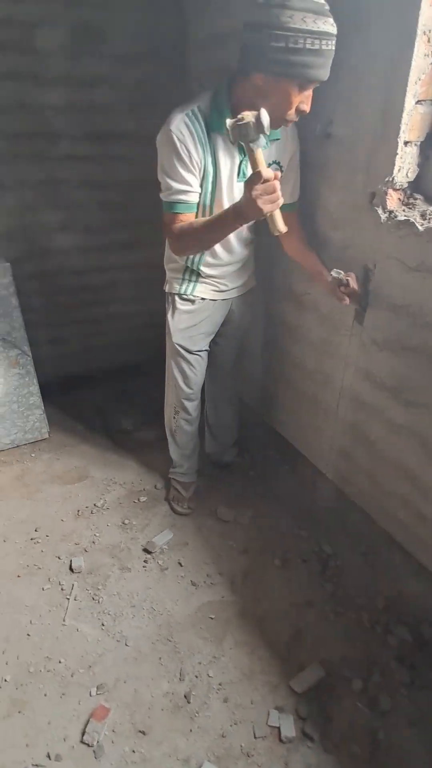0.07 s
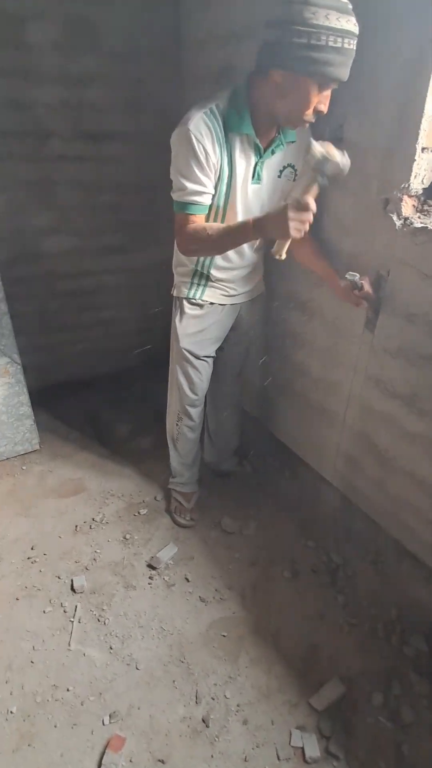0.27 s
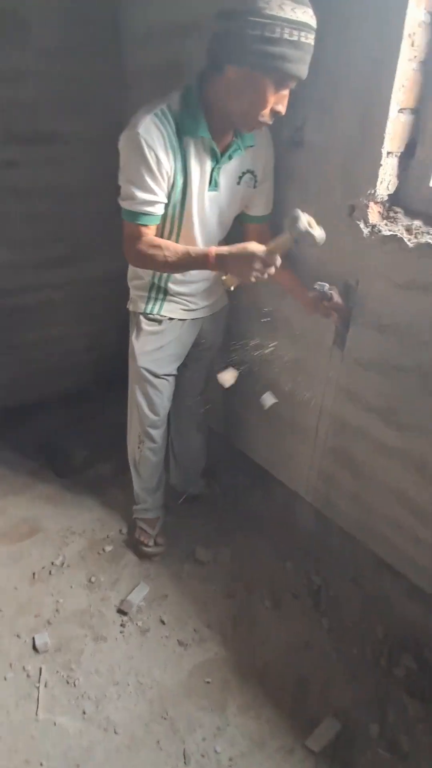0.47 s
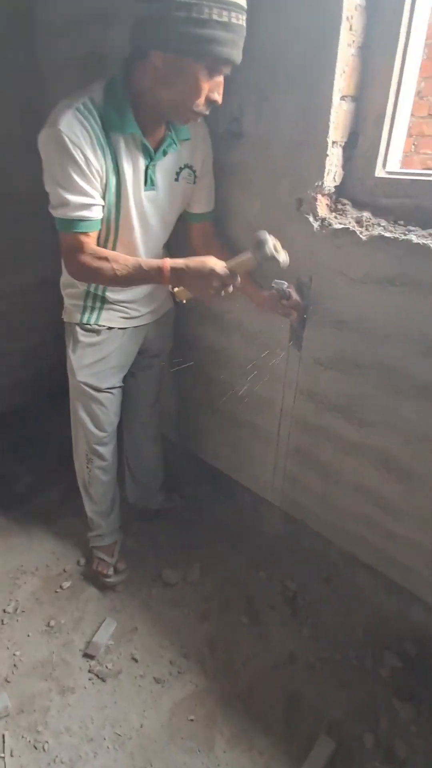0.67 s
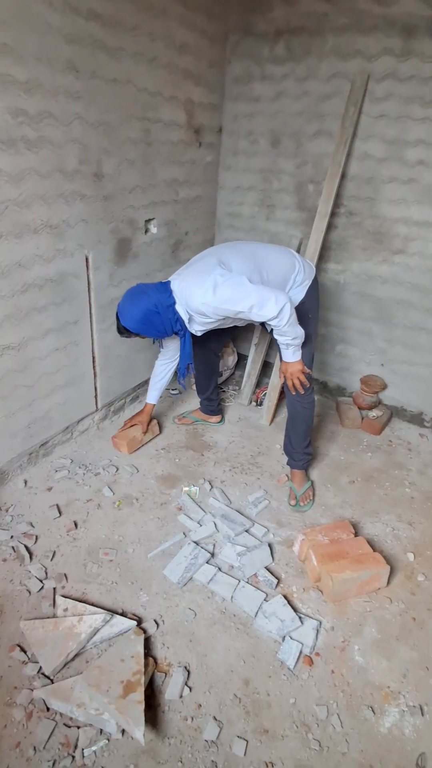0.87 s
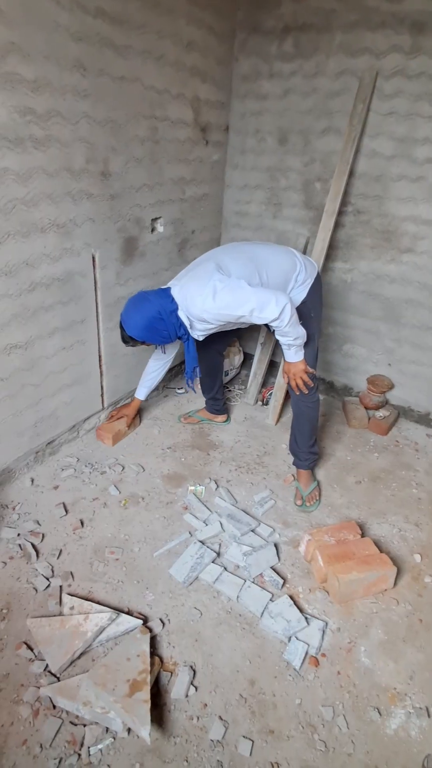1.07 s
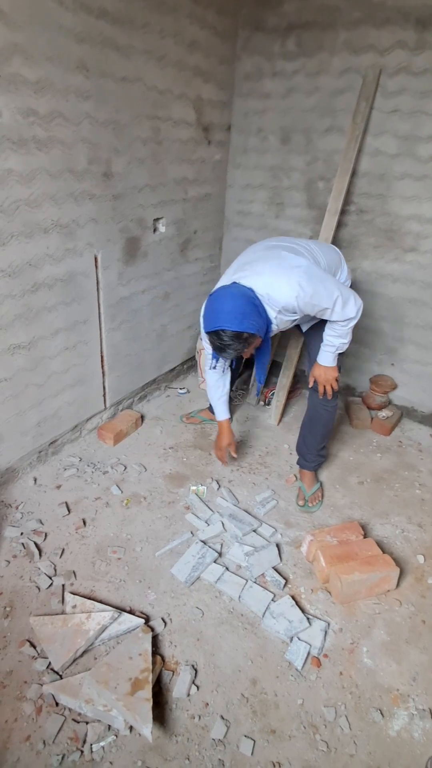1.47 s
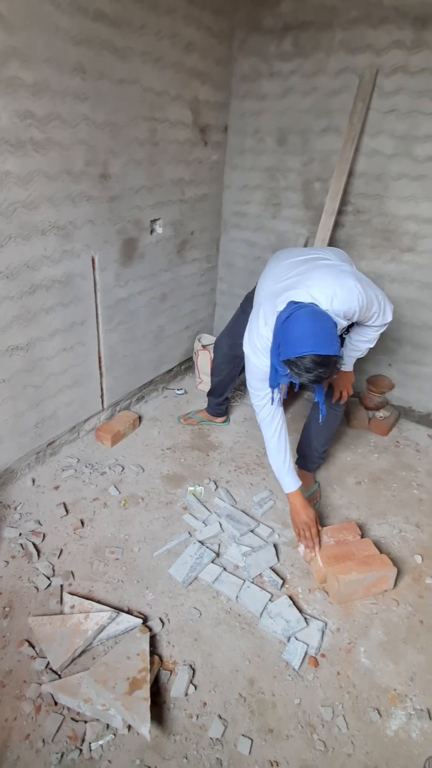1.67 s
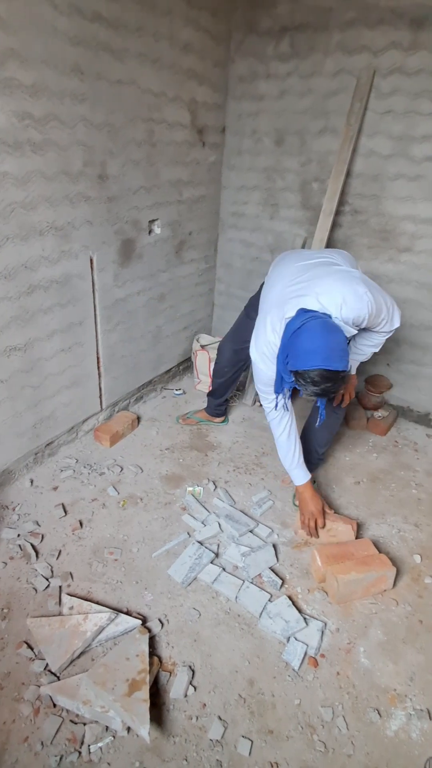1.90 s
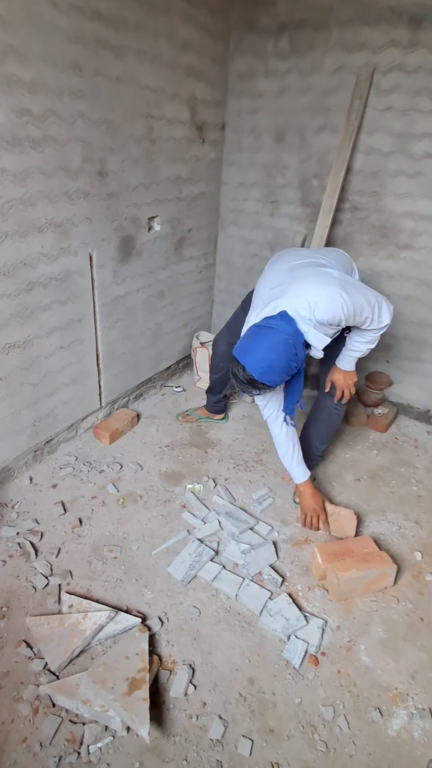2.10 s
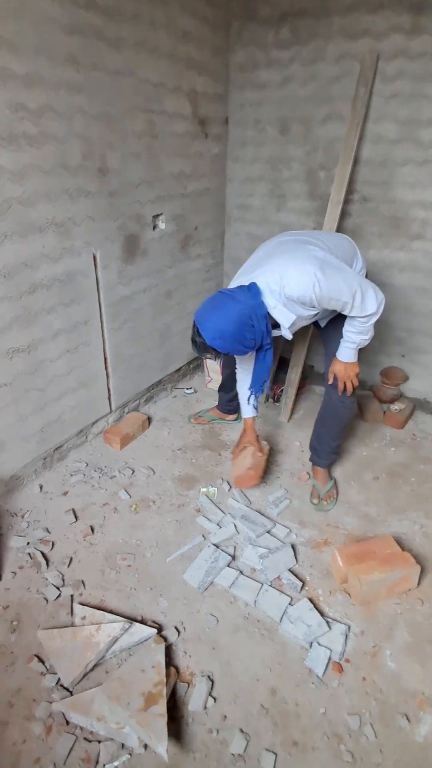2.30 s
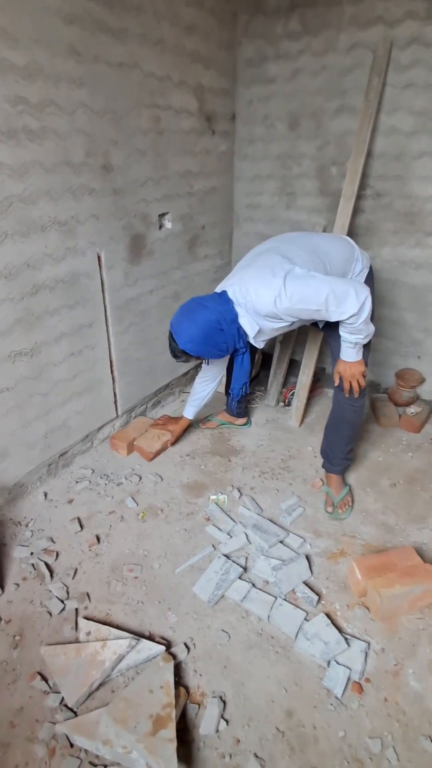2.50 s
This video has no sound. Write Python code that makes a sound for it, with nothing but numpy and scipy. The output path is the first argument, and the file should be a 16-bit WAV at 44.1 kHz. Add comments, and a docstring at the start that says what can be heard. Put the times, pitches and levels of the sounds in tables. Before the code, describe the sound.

A hammer strikes a chisel into masonry three times, then bricks knock and scrape.

```python
"""A bare, ringing room: a hammer drives a chisel into the wall, three hard blows.
Each cracks the masonry, rings the steel and sets the wall booming. Abrupt change to a second
bare room, where bricks are knocked, set down and dragged on a gritty floor.
Puffs of air buffet the two microphone ports, mostly in the second room."""
import sys
import numpy as np
from scipy import signal
from scipy.fft import rfft, irfft
from scipy.io import wavfile

SR = 44100
rng = np.random.default_rng(int(sys.argv[2]) if len(sys.argv) > 2 else 0)


def pcm_store(signal):
    """Save signal as 16-bit PCM."""
    levels = np.round(np.clip(np.atleast_2d(signal), -1, 1) * 32767)
    wavfile.write(sys.argv[1], SR, levels.astype(np.int16).T)


N = 116865
EVENT_SAMPLES = 48000
ROOM_HOLD_S = 0.016  # early echoes hold the level
# decay of the second room: f/Hz, t60/s
ROOM_DECAY = [(200, 0.56), (700, 0.27), (7000, 0.23), (13000, 0.13)]
# spectrum of crushed grit: f/Hz, level/dB
GRIT_SPECTRUM = [(200, 13), (900, -5), (1200, -9), (2300, 1), (3500, -2.5), (7000, -2), (8800, -11),
                 (12000, -6.5), (15500, -11.5)]


def undb(db):
    """Decibels to gain."""
    return 10 ** (np.asarray(db) / 20)


def unit(x):
    """Each channel to rms 1."""
    return x / np.sqrt(np.mean(x ** 2, axis=-1, keepdims=True))


def lookup(points, hz):
    """Interpolate (f/Hz, value) points over log frequency."""
    f, v = np.array(points).T
    return np.interp(np.log(np.maximum(hz, 1)), np.log(f), v)


def pan(db):
    """Channel gains for a left-minus-right level difference."""
    return undb(np.array([[db], [-db]]) / 2)


def blend(x, share):
    """Correlate two independent channels by share, 0 to 1."""
    mid = (x[0] + x[1]) / 2 * np.sqrt(1 + share)
    side = (x[0] - x[1]) / 2 * np.sqrt(1 - share)
    return np.array([mid + side, mid - side])


def add(out, start_s, sound):
    """Mix a sound in at its time."""
    i = max(int(start_s * SR), 0)
    out[:, i:i + sound.shape[1]] += sound[:, :max(N - i, 0)]


def noise(colour, size):
    """Coloured noise, channels independent."""
    gain = undb(lookup(colour, np.fft.rfftfreq(size, 1 / SR)))
    return unit(irfft(rfft(rng.standard_normal((2, size))) * gain, size))


def envelope(rise_s, hold_s, t60_s):
    """Linear rise; exponential fall from hold_s after onset."""
    age = np.arange(EVENT_SAMPLES) / SR
    attack = np.minimum(age / max(rise_s, 1 / SR), 1)
    return attack * np.exp(-np.log(1000) * np.maximum(age - hold_s, 0) / t60_s)


def flutter(rate_hz):
    """Smooth random motion per channel, spread near 1."""
    at = np.arange(EVENT_SAMPLES) / SR * rate_hz
    knots = rng.standard_normal((2, EVENT_SAMPLES // 8))
    return np.array([np.interp(at, np.arange(len(row)), row) for row in knots])


def burst(colour, decays, rise_s, hold_s, tilt_db_oct=0, pan_db_oct=0):
    """A contact smeared by bare walls: grainy, unevenly coloured echoes; treble dies first."""
    hz = np.maximum(np.fft.rfftfreq(EVENT_SAMPLES, 1 / SR), 1)
    octaves = np.log2(hz / 2000)
    grains = rng.standard_normal((2, EVENT_SAMPLES)) * undb(1.5 * flutter(rate_hz=900))
    ripple_step_hz = 127.2
    ripple = np.interp(hz / ripple_step_hz, np.arange(EVENT_SAMPLES), rng.standard_normal(EVENT_SAMPLES))
    ripple_db = 4.5 * ripple * np.sqrt(np.minimum(hz / 2500, 2500 / hz))
    gain = undb(lookup(colour, hz) + tilt_db_oct * octaves + ripple_db)
    echoes = unit(irfft(rfft(grains) * gain))
    spectrum = rfft(echoes) * pan(pan_db_oct) ** octaves
    centres_hz, out = np.geomspace(60, 16000, 14), 0
    for centre_hz, weights in zip(centres_hz, np.eye(len(centres_hz))):
        band = irfft(spectrum * np.interp(np.log(hz), np.log(centres_hz), weights))
        out = out + band * envelope(rise_s, hold_s, lookup(decays, centre_hz))
    return out


def ring(modes, rise_s, hold_s, steady):
    """Decaying modes; overlapping echoes make level and phase waver about a steady part."""
    age, out = np.arange(EVENT_SAMPLES) / SR, 0
    for hz, db, t60_s in modes:
        blur_hz = 45 * min(hz / 500, 2) + 0.025 * hz
        phasor = steady * np.exp(2j * np.pi * rng.random((2, 1)))
        phasor = phasor + flutter(blur_hz) + 1j * flutter(blur_hz)
        tone = (phasor * np.exp(2j * np.pi * hz * age)).real
        fall = envelope(rise_s, hold_s, t60_s)
        out = out + undb(db) * unit(tone * fall) * np.sqrt(np.mean(fall ** 2))
    return out


def chisel():
    """Blows snap, echo, ring the steel and set the wall booming; the chisel is lightly reseated."""
    # hammer blows: t/s, level/dB, tilt/(dB/oct), rise/s, boom/dB, bite/Hz
    blows = [(0.2202, -16.5, -0.81, 0.00062, -1.5, 3760), (0.4458, -18.5, -0.5, 0.0048, -4.5, 900.5),
             (.679, -19, -1.07, 0.0074, -3, 1850)]
    # steel on masonry: f/Hz, level/dB
    crack_spectrum = [(40, -13.5), (130, -2), (300, 1), (600, -6.5), (1000, -3.5), (1900, -4.5),
                      (2800, -6.5), (6800, -6), (8700, -16.5), (10500, -11.5), (13000, -9), (15500, -16.5)]
    # decay of the first room: f/Hz, t60/s
    hall_decay = [(100, 1.1), (300, 0.67), (700, 0.67), (1800, 0.42), (4800, 0.27), (8000, 0.19),
                  (13000, 0.15)]
    # decay of the direct snap: f/Hz, t60/s
    snap_decay = [(1500, .03), (8000, .008)]
    # chisel and hammer head: f/Hz, level/dB, t60/s
    steel_modes = [(843, -32.5, 0.62), (1022, -37, 0.39), (1268, -40.5, 0.28), (1449, -34, 0.6),
                   (2024, -43, 0.87), (2850, -33, .35), (3697, -46, 0.18), (3820, -36, 0.42),
                   (5250, -41.5, 0.19), (6600, -39.5, 0.18), (11680, -31, 0.098), (12340, -29.5, 0.081),
                   (13760, -32.5, 0.09)]
    # wall and room: f/Hz, level/dB, t60/s
    wall_modes = [(86.6, -36, 0.99), (180.94, -38.5, 1.5), (268.4, -38.5, 0.53), (314.5, -33.5, 1)]
    # chisel set on the wall: t/s, level/dB, rise/s
    seatings = [(0.632, -42.5, .015)]
    hold_s, snap_db = 0.034, -4
    bite_db, bite_oct = 5.5, 0.7  # each bite stresses its own band
    out = np.zeros((2, N))
    for start_s, db, tilt_db_oct, rise_s, boom_db, bite_hz in blows:
        colour = [(hz, band_db + bite_db * np.exp(-(np.log2(hz / bite_hz) / bite_oct) ** 2))
                  for hz, band_db in crack_spectrum]
        crumble = undb(1.7 * flutter(rate_hz=190))  # masonry gives way in jerks
        crack = undb(db) * burst(colour, hall_decay, rise_s, hold_s, tilt_db_oct, pan_db_oct=-0.5)
        snap = burst(colour, snap_decay, 0, 0, tilt_db_oct)[:1]
        add(out, start_s + rise_s, undb(db + snap_db) * snap)
        detune = 1 + 0.004 * rng.uniform(-1, 1)  # grip and bite shift the pitch
        modes = [(hz * detune, mode_db, t60_s) for hz, mode_db, t60_s in steel_modes]
        steel = ring(modes, rise_s, hold_s, steady=1)
        boom = undb(boom_db) * blend(ring(wall_modes, rise_s=0.028, hold_s=0.099, steady=3.5), share=1)
        add(out, start_s, crack * crumble * pan(db=-3) + steel * pan(db=-0.5) + boom)
    for start_s, db, rise_s in seatings:
        add(out, start_s, undb(db) * burst(GRIT_SPECTRUM, hall_decay, rise_s, hold_s=0.053))
    return out


def knocks():
    """The first brick meets the floor: clink, dull thud, crunch of grit; the last, faint contact is the second
    brick scuffing."""
    # contacts: t/s, ring/dB, thud/dB, grit/dB, rise/s
    contacts = [(.762, 2.5, -31.5, -38, 0.045), (1.048, -7.5, -36.5, -44, 0.016),
                (1.069, 4.5, -18, -41, 0.0026), (1.175, -36, -53, -57, 0.0054)]
    # first brick: f/Hz, level/dB, t60/s
    brick_modes = [(886, -42, 0.34), (1496, -32, 0.3), (1532, -43, 0.44), (2084, -49, 0.28),
                   (3090, -48, .22)]
    # floor thud: f/Hz, level/dB
    thud_spectrum = [(80, -9.5), (250, -11.5), (390, -4.5), (490, -13.5), (680, -3), (820, -13.5),
                     (1080, -33), (2000, -38), (4000, -67)]
    # crushed grit, coloured by the brick: f/Hz, level/dB
    crunch_spectrum = [(1900, -0.5), (2600, -14), (3200, 4.5), (4250, -8), (4650, -1.5), (7500, -2.5),
                       (8800, -10.5), (11000, -3), (15500, -7.5)]
    out = np.zeros((2, N))
    for start_s, ring_db, thud_db, grit_db, rise_s in contacts:
        clink = undb(ring_db) * ring(brick_modes, rise_s, ROOM_HOLD_S, steady=0.34)
        thud = undb(thud_db) * blend(burst(thud_spectrum, ROOM_DECAY, rise_s, ROOM_HOLD_S), share=0.29)
        crunch = undb(grit_db) * grit(crunch_spectrum, rise_s, hold_s=0.035)
        add(out, start_s, clink + thud * pan(db=-1) + crunch)
    return out


def scrapes():
    """The second brick slides on grit, which rings it, then clacks against its neighbour."""
    # drags and touches: t/s, rise/s, ring/dB, grit/dB, pan/dB
    drags = [(1.33, 0.014, -37, -59.5, 1), (1.743, 0.031, -8, -51.5, -0.5), (1.788, 0.042, -2, -44.5, -0.5),
             (1.95, 0.039, -28.5, -60, -2), (2.049, 0.08, -30, -61, -1), (2.174, 0.011, -6, -60, -2),
             (2.561, 0.0049, -1.5, -47, 0.5), (2.589, 0.0034, 4, -61, 0), (2.616, 0.024, 6, -41, 0)]
    # second brick: f/Hz, level/dB, t60/s
    brick_modes = [(832, -46, 0.18), (1090, -72.5, 0.16), (1430, -67, 0.25), (2010, -62, .2),
                   (2300, -60, 0.38)]
    # brick on brick: f/Hz, level/dB, t60/s
    clack_modes = [(1403, -50.5, 0.25), (2870, -47.5, .11), (3650, -48, 0.099)]
    out = np.zeros((2, N))
    for start_s, rise_s, ring_db, grit_db, pan_db in drags:
        hold_s = rise_s + 0.024
        body = undb(ring_db) * ring(brick_modes, rise_s, hold_s, steady=0.54)
        crunch = undb(grit_db) * grit(GRIT_SPECTRUM, rise_s, hold_s)
        add(out, start_s, pan(pan_db) * (body + crunch))
    clack = ring(clack_modes, rise_s=0.0017, hold_s=ROOM_HOLD_S, steady=0.44)
    add(out, start_s=2.618, sound=clack)
    return out


def grit(colour, rise_s, hold_s):
    """Grains catch and slip under a brick: a crunch in short jerks."""
    return burst(colour, ROOM_DECAY, rise_s, hold_s) * undb(2 * flutter(rate_hz=190)[0])


def chips():
    """Loose stone chips tick and squeak."""
    # ticks and squeaks: t/s, level/dB, f/Hz, width/Hz, rise/s, t60/s
    ticks = [(1.486, -52, 13500, 4960, 0.0012, 0.0091), (2.251, -65, 4020, 500, 0.024, 0.14)]
    out = np.zeros((2, N))
    for start_s, db, hz, width_hz, rise_s, t60_s in ticks:
        colour = [(max(hz - 2 * width_hz, 20), -35), (hz, 0), (hz + 2 * width_hz, -35)]
        add(out, start_s, undb(db) * noise(colour, EVENT_SAMPLES) * envelope(rise_s, rise_s, t60_s))
    return out


def eddy(swell, corner_hz):
    """A swell of low-passed turbulence; the port cuts the deep bass."""
    port_hz, top_hz, order = 66, 380, 2.805
    hz = np.fft.rfftfreq(len(swell), 1 / SR)
    highpass = hz ** 3 / np.hypot(hz ** 3, port_hz ** 3)
    lowpass = 1 / np.hypot(1, (hz / corner_hz) ** order) / np.hypot(1, (hz / top_hz) ** order)
    turbulence = blend(rng.standard_normal((2, len(swell))), share=0.13) * swell
    pressure = irfft(rfft(turbulence) * highpass * lowpass)
    return unit(pressure) * np.sqrt(np.mean(swell ** 2))


def buffets():
    """Short eddies thump the two ports unequally; each core reaches higher than its skirts."""
    # air puffs: centre t/s, time scale/s, level/dB, pan/dB, nominal corner/Hz
    puffs = [(0.475, 0.022, -24.5, 0.5, 80), (0.799, 0.01, -30, 10.5, 113.4), (0.846, 0.01, -23.5, 14, 200),
             (0.885, 0.036, -25.5, 7.5, 52.85), (0.978, 0.025, -20, 6.5, 92.6),
             (1.114, 0.021, -28.5, 16.5, 89), (1.156, 0.012, -14, 8, 105), (1.254, 0.04, -29.5, -7.5, 91),
             (1.349, 0.013, -26, -5.5, 114.6), (1.467, 0.015, -26, -3, 132),
             (1.498, 0.017, -27.5, -3, 108.4), (1.572, 0.012, -29.5, 8, 125),
             (1.606, 0.022, -24.5, -1.5, 105.5), (1.663, 0.028, -30.5, -3.5, 102),
             (1.731, 0.007, -28.5, 8, 135), (1.807, 0.024, -26.5, 5, 116), (1.892, 0.02, -27.5, 5.5, 122),
             (1.96, 0.0086, -24, -2, 80), (2.085, 0.027, -46, 16.5, 87), (2.191, 0.0056, -23.5, 3, 74.4),
             (2.232, 0.0099, -25.5, -6.5, 129), (2.268, 0.029, -28, -2.5, 103),
             (2.372, 0.0086, -25.5, -1.5, 110), (2.497, 0.049, -37.5, 0.5, 97), (2.617, 0.046, -36, -5, 94)]
    out, size = np.zeros((2, N)), 2 ** 14
    offset_s = (np.arange(size) - size // 2) / SR
    for centre_s, scale_s, db, pan_db, corner_hz in puffs:
        swell = np.exp(1 - np.hypot(offset_s / scale_s, 1)) ** 1.45
        skirts = eddy(swell, 0.76 * corner_hz)
        core = undb(-5) * eddy(swell ** 2, 2 * corner_hz)
        add(out, centre_s + offset_s[0], undb(db) * pan(pan_db) * (skirts + core))
    return out


def hall_air():
    """Steady rumble of the first room."""
    # background: f/Hz, level/dB
    spectrum = [(25, -23), (83, 6), (130, -11.5), (195, -4.5), (550, -20.5), (1500, -26.5), (7000, -42.5),
                (9000, -54), (15500, -55)]
    return undb(-42) * blend(noise(spectrum, N), share=0.57)


def room_air():
    """Steady rumble and faint hiss of the second room."""
    # background: f/Hz, level/dB
    spectrum = [(25, -3.5), (75, 7), (250, -20), (500, -29), (1200, -39), (4000, -43), (9000, -54.5),
                (15500, -46.5)]
    return undb(-46.5) * noise(spectrum, N)


def scene():
    """Chiselling room, then brick room; air buffets the ports."""
    t, change_s = np.arange(N) / SR, 0.755
    first = chisel() + hall_air()
    second = knocks() + scrapes() + chips() + room_air()
    return np.where(t < change_s, first, second) + buffets()


def record(dry):
    """Recorder: steep low-pass."""
    top_hz = 15900
    return signal.sosfilt(signal.ellip(8, .2, 70, top_hz, fs=SR, output="sos"), dry)


dry = scene()
out = record(dry)
pcm_store(out)
```